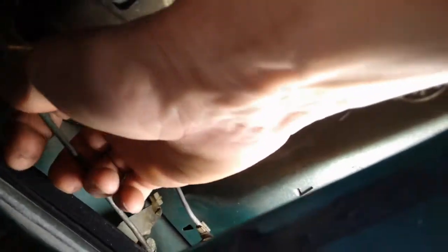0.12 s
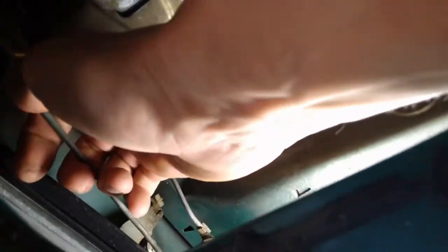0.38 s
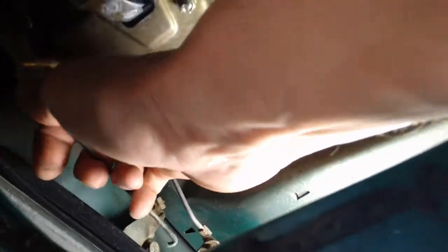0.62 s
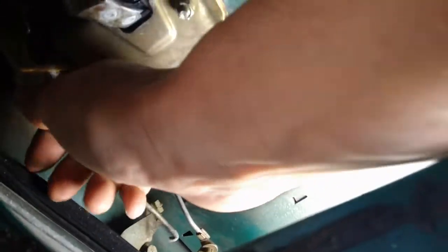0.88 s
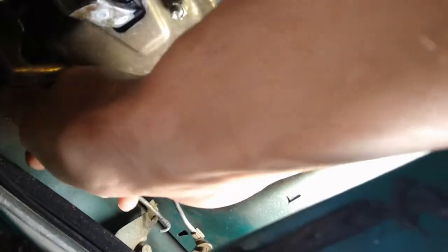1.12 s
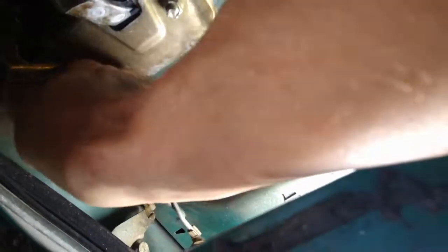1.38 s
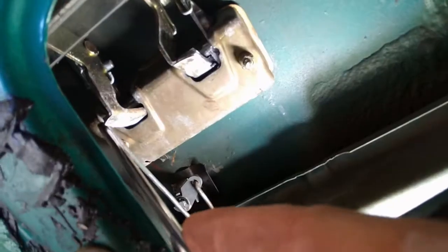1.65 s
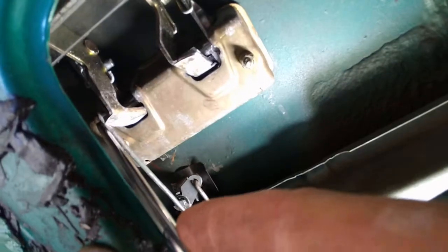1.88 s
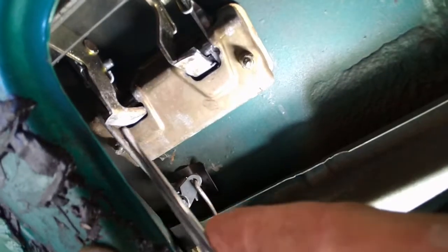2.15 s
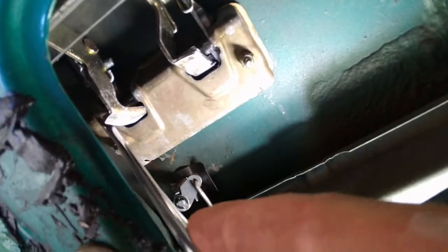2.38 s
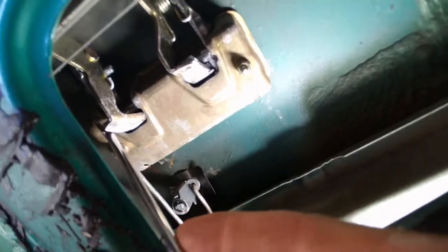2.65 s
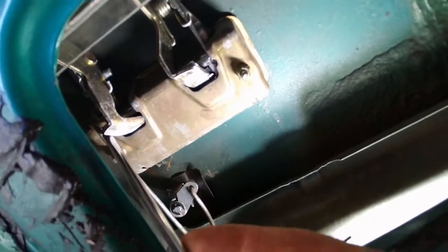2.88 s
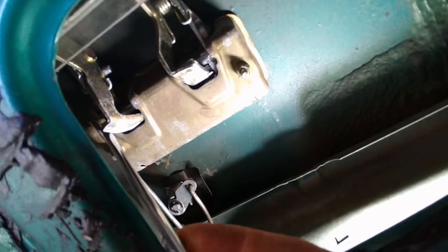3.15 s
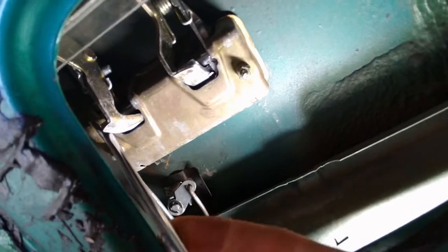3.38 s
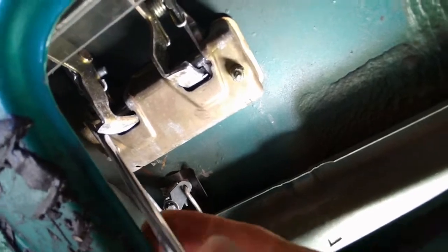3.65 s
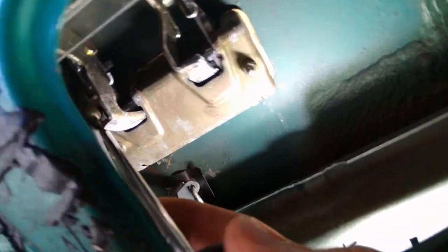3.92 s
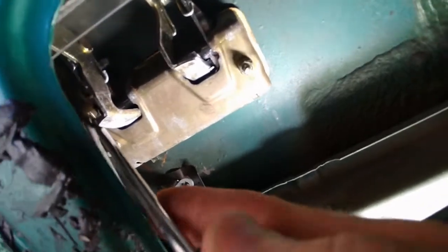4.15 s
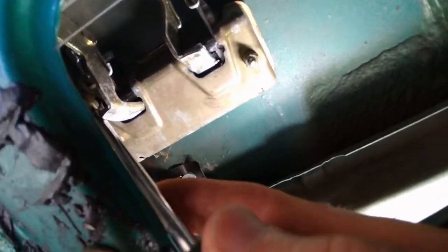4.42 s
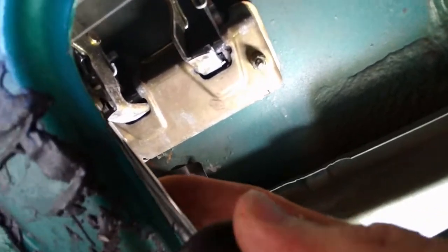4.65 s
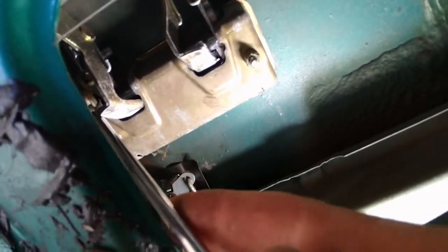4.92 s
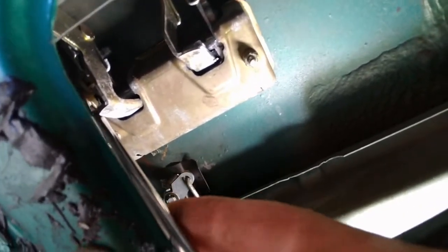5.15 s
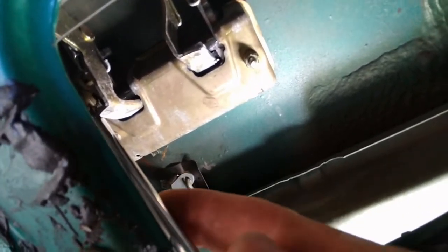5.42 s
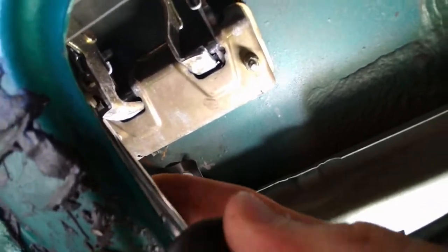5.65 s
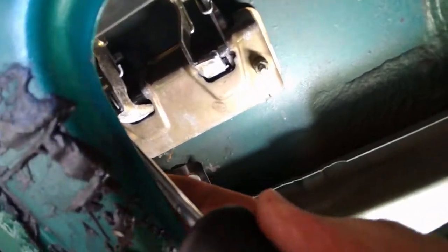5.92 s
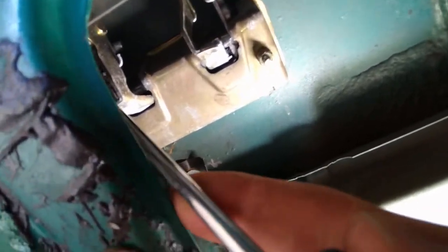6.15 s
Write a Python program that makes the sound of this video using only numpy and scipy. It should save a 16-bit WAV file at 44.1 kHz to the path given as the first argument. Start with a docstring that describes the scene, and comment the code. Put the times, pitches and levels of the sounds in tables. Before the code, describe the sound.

A hand fiddles with a latch rod in a door shell: quiet ticks, then bright clacks, low thumps and thin metallic scraping, heard close.

```python
"""Inside a hollow car door in a garage, a hand works a steel rod and its clip, close to a two-port microphone.
Contacts are short rattles of bounces that ring the rod, latch plate and door skin (the outer sheet).
Between them the rod scrapes in tiny slips, evenly spaced slips creak faintly, soft pushes thump and boom
in the skin, and a bird chirps with a rising tone. Shaped noise makes the steady hush behind it all."""
import sys
import numpy as np
from scipy import signal
from scipy.fft import rfft, irfft, next_fast_len
from scipy.io import wavfile
from scipy.ndimage import uniform_filter1d, map_coordinates

SR = 44100
rng = np.random.default_rng(int(sys.argv[2]) if len(sys.argv) > 2 else 0)


def to_wav(s):
    """Save 16-bit WAV."""
    ch = np.atleast_2d(s).T  # columns
    pcm = np.round(np.clip(ch, -1, 1) * 32767)  # PCM
    wavfile.write(sys.argv[1], SR, pcm.astype(np.int16))


def natural_amplitude(level_db):
    """Convert a level in decibels to a linear amplitude factor, elementwise."""
    exponent = np.asarray(level_db, float) / 20
    return 10 ** exponent


N = 277389  # length in samples

# Levels in dB are those before the mix, the two ports and the bass cut. A fade time is the time to fall 60 dB.
# contacts of the metal parts: start_s, clink_level_db, knock_over_clink_db, tick_over_clink_db,
# fade_s (the rattle uses 0.37 of it, the choking of the ring 1.9)
CONTACTS = [(0.003, -52, 12, -29, 0.036), (0.206, -52, 6, -8, 0.18), (0.4954, -39, -3, 5.5, 0.022),
            (0.518, -52, -1, -22, 0.38), (0.617, -42.5, 1, 3.5, 0.094), (0.629, -36.5, 1.5, -6.5, 0.22),
            (0.667, -43, -8, -7, 0.084), (0.848, -52, -5.5, -8, 0.25), (0.975, -49.5, -5, -5.5, 0.11),
            (1.203, -35.5, -3, -1, 0.11), (1.418, -46, -5, -12, 0.1), (1.596, -26.5, -5.5, -7, 0.34),
            (1.646, -36, 1.5, -42, 0.12), (1.699, -37.5, -4, 2.5, .3), (1.711, -11, -12, -5.5, 0.058),
            (1.719, -14, -31, -9, 0.11), (1.824, -25, -15.5, -24, 0.008), (1.847, -39, 3.5, -20, 0.058),
            (1.88, -27, 5, -12, 0.12), (1.893, -13, -7, -11, 0.14), (1.927, -29.5, 10, -25, 0.14),
            (2.02, -50.5, 16.5, -10, 0.18), (2.142, -57, 18, -8, 0.033), (2.211, -20, -7, -1, 0.064),
            (2.222, -36.5, -1, 8, 0.081), (2.309, -28.5, -20, -31, 0.14), (2.322, -29, -2, -12.5, 0.0495),
            (2.381, -22, -18.5, -15.5, 0.013), (2.437, -49, 3.5, -12, 0.136),
            (2.456, -36.5, -7, -12.5, 0.043), (2.774, -26.5, 4, -27, 0.13), (2.941, -43.5, 5, -34, 0.054),
            (3.106, -49.5, 16, -37, 0.127), (3.638, -43.5, 15.5, -22, 0.17), (3.815, -67, 18, 1, 0.025),
            (4.031, -26, -6, -8, 0.095), (4.046, -14.5, -2, 2, 0.1), (4.055, -21.5, 3, -4.5, 0.44),
            (4.1003, -16, -1, 9.5, 0.075), (4.337, -37.5, -1.5, -25, 0.38), (4.485, -30.5, -6.5, -14, 0.18),
            (4.499, -21, -3.5, -0.5, 0.1), (4.613, -16, 1.5, -14, 0.061), (4.747, -50.5, 5, -5, 0.284),
            (4.885, -51, -3, -8.5, 0.121), (5.059, -22, -5.5, -19, 0.016), (5.132, -20, 1.5, -15.5, 0.092),
            (5.183, -28.5, 3.5, -16, 0.078), (5.385, -41, 10, -47, 0.49), (5.468, -21, -2.5, -9.5, 0.11),
            (5.489, -18, -4, 5.5, 0.039), (5.5, -14.5, -7.5, -11.5, 0.06),
            (5.896, -34.5, 0.5, -14.5, 0.0097), (6.213, -20.5, -10, -8, 0.033),
            (6.225, -23.5, -4, -14, 0.074)]
# strong tones of door, plate and rod: pitch_hz, level_db, fade_s
DOOR_MODES = [(101.3, 4, 0.14), (163.1, -5, 0.4), (244.1, 3, 0.17), (265.4, 4.5, 0.22), (336, -12, 0.21),
              (445.3, -5.5, 0.13), (596, 3.5, 0.047), (734, -4.5, 0.075), (808.5, 0.5, 0.064),
              (922, -7, 0.32), (1099, 5.5, 0.054), (1258, 1, 0.21), (1404, -3, .14), (1722, 1, 0.044),
              (1939, 1.5, 0.079), (2153, -4, 0.21), (2540, 5, 0.039), (2923, 4.5, 0.067), (2905, -5.5, 0.2),
              (3218, 12, 0.027), (3610, -4.5, 0.12), (4570, -15, 0.15), (5070, 1, 0.026),
              (8500, -10.5, 0.027), (8550, -15, 0.087), (11300, -16, 0.013)]
# dense finer ringing of the sheet metal: pitch_hz, level_db (per Hz)
SHEET_LEVEL = [(40, -56.5), (100, -8), (260, -3), (500, -18), (1080, -4), (1450, -8.5), (1850, -7.5),
               (2350, -8), (3000, -9), (3900, -14.5), (6500, -21), (9500, -23), (13300, -36),
               (16000, -56.5)]
# how long that ringing lasts: pitch_hz, fade_s
SHEET_FADE = [(100, 0.37), (300, 0.3), (1000, 0.13), (3000, 0.19), (7000, 0.13), (14000, 0.058)]
# tones that speak up under each part the hand loads, by part name: pitch_hz, width_hz, lift_db
FAVOURED = {"loose rod": [(826, 44, 16), (1829, 70, 15.5), (2700, 73, 10), (4455, 47, 15), (5830, 70, 9.5),
            (8100, 110, 6.5), (9000, 200, 3.5)], "clip": [(1088, 90, 7), (1880, 70, 11.5), (2980, 220, 16),
            (5300, 710, 0.5), (13000, 3000, -10.5)], "plate": [(660, 130, 7), (1040, 300, 7),
            (2700, 860, 6)], "hooked rod": [(1084, 140, 8.5), (1920, 52, 10), (3110, 140, 9),
            (12000, 3000, 9)], "dragged rod": [(2060, 260, 16), (3050, 200, 0.5)],
            "sliding rod": [(263, 25, 6), (1080, 140, 9.5), (1750, 110, 15.5), (3060, 220, 8.5)]}
# which part the hand loads: start_s, part_name
IN_PLAY = [(0, "dragged rod"), (.15, "loose rod"), (1.69, "clip"), (1.87, "plate"), (2.1, "loose rod"),
           (2.37, "dragged rod"), (2.7, "plate"), (4.0, "hooked rod"), (4.15, "dragged rod"),
           (4.47, "hooked rod"), (4.6, "plate"), (4.7, "sliding rod"), (5.12, "plate"),
           (5.25, "sliding rod"), (5.46, "hooked rod"), (5.6, "sliding rod")]
# edges between boom, knock, clink and tick: edge_hz
EDGES_HZ = [475, 1450, 4700]
# strokes of the hand: strongest_s, rise_s, fall_s, scrape_level_db, palm_weight_on_skin_db
STROKES = [(0.001, 0.054, 0.052, -47.5, -29.5), (.3, 0.72, 0.058, -70, -55.5),
           (.58, 0.14, 0.23, -58.5, -46), (.95, 0.1, 0.14, -65, -47), (1.4, 0.19, 0.29, -65.5, -66),
           (1.682, 0.2, 0.12, -63.5, -44.5), (1.709, 0.0066, 0.0083, -30, -47),
           (2.0, 0.19, 0.29, -57, -45.5), (2.29, 0.093, 0.12, -46, -51), (2.55, 0.027, 0.3, -64, -55),
           (2.899, 0.54, 0.46, -64.5, -61.5), (3.779, 0.1, 0.38, -71.5, -55.5),
           (4.168, 0.1, 0.36, -47.5, -36.5), (4.459, 0.25, 0.36, -54, -52), (4.6, 0.35, 0.34, -52, -41),
           (4.717, 0.36, 0.18, -55, -48), (4.92, 0.093, 0.24, -53.5, -48),
           (5.044, 0.0575, 0.145, -40.5, -45), (5.297, 0.016, 0.034, -45.5, -49),
           (5.37, 0.13, 0.083, -46.5, -42), (5.43, 0.068, 0.13, -56.5, -42),
           (5.62, 0.26, 0.071, -53, -41.5), (5.88, 0.31, 0.24, -59, -48), (6.142, 0.0096, 0.077, -35, -45),
           (6.158, 0.026, 0.086, -34, -51.5), (6.199, 0.048, .04, -31, -44)]
# soft pushes of knuckle or palm on the skin: start_s, peak_db, fade_s (on top of the skin's own fading)
THUMPS = [(0.507, -37, 0.26), (1.208, -51, 0.13), (1.613, -33, 0.16), (1.711, -34.5, 0.51),
          (1.839, -33, 0.15), (2.223, -31, 0.18), (2.315, -39.5, 0.19), (2.46, -46, 0.14),
          (3.64, -33.5, 0.15), (3.816, -36, 0.31), (4.05, -11.5, 0.11), (4.105, -25.5, 0.17),
          (4.209, -30.5, 0.21), (4.506, -27, 0.38), (4.89, -40, 0.11), (4.998, -42.5, 0.12),
          (5.072, -35.5, 0.19), (5.136, -31.5, 0.32), (5.289, -40, 0.1), (5.393, -28, 0.16),
          (5.51, -25.5, 0.19), (5.907, -30, 0.46), (6.116, -38, 0.17), (6.24, -27.5, 0.13)]
# bird chirps: start_s (below 0 = already under way), tone_level_db, echo_level_db
CHIRPS = [(-.038, -75, -68), (.442, -64.5, -59.5), (1.087, -61.5, -62)]
# tone of the garage hush: pitch_hz, level_db (per Hz)
HUSH_TONE = [(15, -47.5), (25, -13), (87, 10.5), (175, -0.5), (256, -14.5), (560, -7.5), (1130, -16),
             (1740, -14), (3250, -19), (11000, -23.5), (16000, -32.5)]
# how alike left and right are in the hush: pitch_hz, likeness (0 to 1)
HUSH_ALIKE = [(60, 0.7), (180, 0.92), (550, 0.6), (1650, 0.67), (4970, 0.17), (15000, 0.61)]
# the two ports, loudness: pitch_hz, left_minus_right_db
PORT_BALANCE = [(60, 2), (130, 4), (290, 0), (640, 7), (1410, -1.5), (3100, -4.5), (6820, 2), (9500, 11),
                (15000, 13)]
# the two ports, timing: pitch_hz, left_lead_radians
PORT_LEAD = [(0, 0.05), (150, 0.1), (600, 1), (950, 1.4), (1720, 4.28), (2070, 2.8), (3360, 10.1),
             (4310, 8.25), (5680, 10), (11000, 14.54), (16000, 10)]
# the two ports, likeness of what they hear: pitch_hz, likeness (0 to 1)
PORT_ALIKE = [(30, .5), (100, 0.82), (300, 1), (600, 0.68), (3000, 0.025), (7000, 0.14), (12000, 1)]
# where the hand works: time_s, left_minus_right_db
PLACE = [(0, 2), (1.2, 2.5), (1.9, 1), (2.702, -0.5), (4.5, 1.5), (5.299, 0), (6.29, 0)]

# a knock reaches the skin this much over or under the plate, and changes by this much on the plate itself
SKIN_OVER_PLATE_DB, PLATE_SPARES_SKIN_DB = -5, -4.5
# a stroke is this much weaker at the ends of its rise and fall; scrape and weight of the resting hand
STROKE_FADE_DB, REST_SCRAPE_DB, REST_WEIGHT_DB = 12.5, -75.5, -68.5
# fine rasp at a scrape of -50 dB, and its growth in dB per dB of scrape
RASP_DB, RASP_GROWS = -65, 0.7
THUMP_RISE_S = 0.023
# full strength from and to, with a fade outside each end; slips per second, and their slowing each second
CREAK_FROM_S, CREAK_TO_S, CREAK_FADE_S = 5.955, 6.11, 0.02
CREAK_HZ, CREAK_SAG_HZ_PER_S, CREAK_DB = 154, 40, -58
CHIRP_S, CHIRP_FROM_HZ, CHIRP_TO_HZ = 0.05, 2250, 3300
HUSH_DB = -66.5


def unit(x):
    """Scale to an average (rms) strength of 1."""
    return x / np.sqrt(np.mean(x ** 2) + 1e-20)


def along(points, hz):
    """Read a curve of (pitch, value) points, with pitch on a log axis."""
    f, v = np.transpose(points)
    return np.interp(np.log(hz + 1), np.log(f + 1), v)


def filtered(x, response):
    """Shape the spectrum of x by a response that depends on frequency."""
    n = x.shape[-1]
    m = next_fast_len(n + 4096)
    return irfft(rfft(x, m) * response(np.fft.rfftfreq(m, 1 / SR)), m)[..., :n]


def parts(hz):
    """Boom, knock, clink and tick: four overlapping shares of the spectrum that add up to one."""
    above = [1 / (1 + (edge / (hz + 1)) ** 8) for edge in EDGES_HZ]
    return np.array([1 - above[0], above[0] - above[1], above[1] - above[2], above[2]])[:, None]


def grit(n, spiky_db, most_db):
    """Tiny slips and bounces of uneven size, as noise with random strength."""
    size_db = np.minimum(spiky_db * rng.exponential(size=n), most_db)
    return unit(rng.standard_normal(n) * natural_amplitude(size_db))


def in_play(s):
    """Name the part the hand loads at these times."""
    start, part = zip(*IN_PLAY)
    return np.array(part)[np.searchsorted(start, s, side="right") - 1]


def resonance(f, centre, width):
    """One resonance lets through the pitches near its centre, at full size in the middle."""
    return 1j * f * width / (centre * centre - f * f + 1j * f * width)


def ring(modes_db, scatter_db, part="plate"):
    """The door's answer to a tap, drawn twice: dying tones of random strength over dense dying noise."""
    n = SR // 4

    def lift(f):
        return np.prod([1 + (natural_amplitude(db) - 1) * resonance(f, c, w) for c, w, db in FAVOURED[part]], axis=0)

    hz, s, z = signal.stft(rng.standard_normal((2, n)), SR, nperseg=256)
    z = z * natural_amplitude(along(SHEET_LEVEL, hz)[:, None] - 60 * s / along(SHEET_FADE, hz)[:, None])
    z = z * natural_amplitude(2 * rng.standard_normal(len(hz)))[:, None]  # each tap wakes other clumps of tones
    thicket = unit(signal.istft(z, SR, nperseg=256)[1][:, :n])

    hz, db, t60 = np.transpose(DOOR_MODES)
    size = natural_amplitude(db + scatter_db * rng.standard_normal((2, len(hz))))
    size = size * np.exp(2j * np.pi * rng.random((2, len(hz))))
    f = np.fft.rfftfreq(n, 1 / SR)
    dying_sines = 1 / (np.log(1000) / t60[:, None] + 2j * np.pi * (f - hz[:, None]))
    modes = irfft(size @ dying_sines, n)
    fade = np.cos(np.linspace(0, np.pi / 2, n)) ** 2  # ends in silence
    return filtered(thicket + natural_amplitude(modes_db) * unit(modes), lift) * fade


def pair(x, alike):
    """Mix two unrelated draws into a left and right of the given likeness."""
    def shares(hz):
        turn = np.arccos(np.clip(along(alike, hz), -1, 1)) / 2
        return np.array([np.cos(turn), np.sin(turn)])

    mid, side = filtered(x, shares)
    return np.array([mid + side, mid - side])


def contacts():
    """A dying rattle of bounces rings the metal; fingers choke clink and tick, while knock and boom ring freely."""
    lead = 512  # samples of room ahead, for what the filter spreads before the first touch
    out = np.zeros((2, N + SR))
    t = np.arange(SR // 8) / SR
    for s, db, door_db, tick_db, t60 in CONTACTS:
        t60 = np.clip(t60, 0.005, 0.5)
        rattle = grit(len(t), spiky_db=9.5, most_db=31.0)
        rattle = rattle * natural_amplitude(-60 * t / (0.37 * t60)) * (1 - np.exp(-t / 0.0012))
        rattle[0] = 5  # the first touch
        answer = ring(modes_db=-2.5, scatter_db=3.5, part=in_play(s))
        sound = signal.fftconvolve(rattle[None], answer, axes=1)

        split = filtered(np.pad(sound, ((0, 0), (lead, 0))), parts)
        since = np.arange(sound.shape[1]) / SR
        split[2:, :, lead:] *= natural_amplitude(-12.5) + natural_amplitude(-60 * since / (1.9 * t60))
        split[0, :, lead:] *= 1 - np.exp(-since / 0.012)  # the skin takes a few swings to move
        split[0, :, :lead] = 0
        # even out the strength of each part, judged by its loud portion
        size = np.sqrt(np.sum(split ** 4, axis=(1, 2)) / np.sum(split ** 2, axis=(1, 2)))
        split = split / (2.248 * size[:, None, None])

        skin_db = door_db + SKIN_OVER_PLATE_DB + PLATE_SPARES_SKIN_DB * (in_play(s) == "plate")
        levels = natural_amplitude(db + np.array([skin_db, door_db, 0, tick_db]))
        sound = np.tensordot(levels, split, 1)
        start = round(s * SR)
        out[:, start:start + sound.shape[1]] += sound
    return out[:, lead:lead + N]


def rubbing():
    """Sliding sends a stream of small slips through the same door, while the palm shakes the skin."""
    s, rise, fall, scrape_db, weight_db = np.transpose(STROKES)[:, :, None]
    coarse = np.arange(0, N, 64)
    after = coarse / SR - s
    fade_db = STROKE_FADE_DB * np.maximum(-after / np.abs(rise), after / np.abs(fall))

    def strongest(db, rest_db):
        return np.interp(np.arange(N), coarse, np.maximum((db - fade_db).max(axis=0), rest_db))

    boom_db = strongest(weight_db, REST_WEIGHT_DB)
    scrape_db = strongest(scrape_db, REST_SCRAPE_DB)
    rasp_db = RASP_DB + RASP_GROWS * (scrape_db + 50)

    # the contact wanders, mostly on the part in play
    knots = rng.standard_normal((len(FAVOURED) + 1, N // 2500 + 4))
    lumps, *wander = [map_coordinates(row, [np.arange(N) / 2500]) for row in knots]
    loaded = in_play(np.arange(N) / SR) == np.array(list(FAVOURED))[:, None]
    loaded = uniform_filter1d(1. * loaded, size=2000, axis=1)
    grip = natural_amplitude(6.8 * np.array(wander) + 14 * loaded)
    grip = grip / np.linalg.norm(grip, axis=0)

    sound = np.zeros((2, N))
    for share, part in zip(grip, FAVOURED):
        slips = share * grit(N, spiky_db=5.5, most_db=25)
        answer = ring(modes_db=-3.5, scatter_db=4.0, part=part)
        sound += signal.fftconvolve(slips[None], answer, axes=1)[:, :N]
    boom, knock, clink, tick = (unit(band) for band in filtered(sound, parts))

    scrape_db = scrape_db + 2.5 * wander[0]  # the pressure is uneven
    dull = natural_amplitude(-0.3 * (scrape_db + 48.5))  # the harder the scrape, the more clink against knock
    scrape = (dull * knock + clink) / np.sqrt(1 + dull ** 2)
    # the free length of rod changes, so its pitches drift
    slide = map_coordinates(knots[1], [np.arange(N) / 9000])
    moved = np.arange(N) + 55 * slide
    scrape = np.array([map_coordinates(row, [moved], mode="nearest") for row in scrape])
    return natural_amplitude(boom_db + 2.9 * lumps - 2.0) * boom + natural_amplitude(scrape_db) * scrape + natural_amplitude(rasp_db) * tick


def thumps():
    """A soft push moves only the skin's low tones, and the flesh resting on it damps them."""
    out = np.zeros((2, N + SR))
    t = np.arange(SR // 4) / SR
    for s, db, t60 in THUMPS:
        boom = filtered(ring(modes_db=5.5, scatter_db=1.5, part=in_play(s)), parts)[0]
        boom = boom * (1 - np.exp(-t / THUMP_RISE_S)) * natural_amplitude(-60 * t / np.clip(t60, 0.03, 2))
        out[:, round(s * SR):][:, :len(t)] += natural_amplitude(db) * boom / np.abs(boom).max()
    return out[:, :N]


def creak():
    """Evenly spaced slips make a row of overtones, heard only where the plate rings."""
    t = np.arange(N) / SR
    rate = np.clip(CREAK_HZ - CREAK_SAG_HZ_PER_S * (t - CREAK_FROM_S), 0, None)
    slips = np.diff(np.floor(np.cumsum(rate) / SR), prepend=0)

    def plate(f):
        return (natural_amplitude(7.6) * resonance(f, 1150, 180) + natural_amplitude(0.5) * resonance(f, 1660, 240)) ** 2

    inside = np.minimum(t - CREAK_FROM_S, CREAK_TO_S - t)
    held = np.clip(inside / CREAK_FADE_S + 1, 0, 1) ** 2
    return natural_amplitude(CREAK_DB) * held * unit(filtered(slips, plate))


def chirps():
    """A bird chirps, a rough rising tone with overtones, then a soft hissing echo dies away."""
    out = np.zeros(N + SR)  # one second of lead for a chirp already under way
    noise = rng.standard_normal(N + SR)
    hiss = unit(filtered(noise, lambda hz: 1 / (1 + ((hz - 6400) / 500) ** 2)))
    t = np.arange(SR // 4) / SR
    u = np.linspace(0, 1, round(CHIRP_S * SR))
    for start, db, echo_db in CHIRPS:
        rough = 1 + 0.04 * unit(uniform_filter1d(rng.standard_normal(len(u)), size=30))
        # each overtone flutters in its own way
        flutter = uniform_filter1d(rng.standard_normal((4, len(u))), size=130, axis=1)
        flutter = natural_amplitude(5 * unit(flutter))
        pitch = CHIRP_FROM_HZ + (CHIRP_TO_HZ - CHIRP_FROM_HZ) * np.sin(np.pi / 2 * u) ** 1.3
        turn = 2 * np.pi * np.cumsum(pitch * rough) / SR
        overtones = np.sin(np.arange(1, 5)[:, None] * turn)
        tone = np.sum(natural_amplitude([[-5], [-9], [-11], [-14]]) * flutter * overtones, axis=0)
        swell = np.abs(np.sin(np.pi * u)) ** 0.43
        out[round((1 + start) * SR):][:len(u)] += natural_amplitude(db) * swell * tone

        at = round((1 + start + CHIRP_S - 0.015) * SR)
        echo_shape = natural_amplitude(echo_db - 60 * t / 0.31) * (1 - np.exp(-t / 0.0021))
        out[at:at + len(t)] += echo_shape * hiss[at:at + len(t)]
    return out[SR:]


def ports(x):
    """Sound reaches the two ports with different timing and loudness at each pitch."""
    half = np.array([[0.5], [-0.5]])

    def path(hz):
        return natural_amplitude(half * along(PORT_BALANCE, hz)) * np.exp(1j * half * along(PORT_LEAD, hz))

    x = filtered(pair(x, PORT_ALIKE), path)
    s, db = np.transpose(PLACE)
    return x * natural_amplitude(half * np.interp(np.arange(N) / SR, s, db))


def hush():
    """Steady garage air and microphone hiss, as shaped noise."""
    noise = filtered(rng.standard_normal((2, N)), lambda hz: natural_amplitude(along(HUSH_TONE, hz)))
    return natural_amplitude(HUSH_DB) * unit(pair(noise, HUSH_ALIKE))


def scene():
    """The work in the door and the bird, sources too small for deep bass, over the hush."""
    near = ports(natural_amplitude(0.5) * contacts() + natural_amplitude(-1.5) * rubbing() + thumps() + creak() + chirps())
    return filtered(near, lambda hz: (1j * hz / (1j * hz + 60)) ** 3) + hush()


def roll_off(x):
    """The treble ends steeply here."""
    return signal.sosfilt(signal.butter(12, 16480, fs=SR, output="sos"), x)


def record(dry):
    """The camera cuts steeply above its band limit of 15800 Hz."""
    kept = filtered(dry, lambda hz: 1 / (1 + (hz / 15800) ** 40))
    return roll_off(kept)


dry = scene()
out = record(dry)
to_wav(out)
```